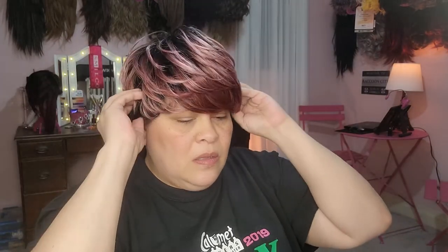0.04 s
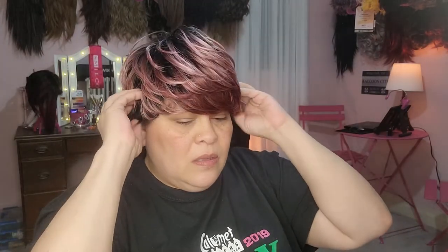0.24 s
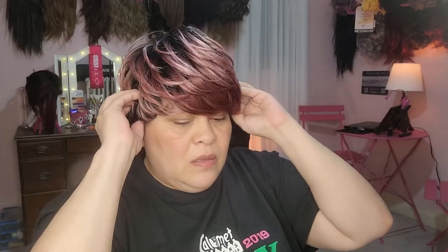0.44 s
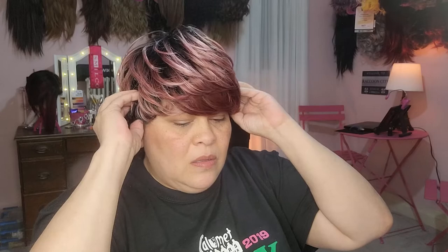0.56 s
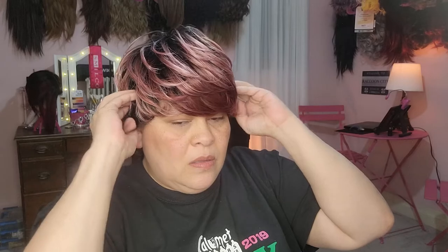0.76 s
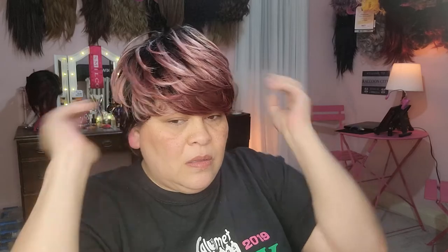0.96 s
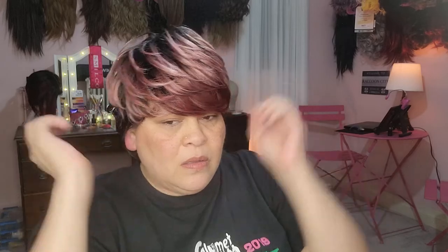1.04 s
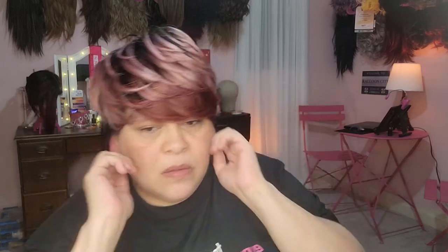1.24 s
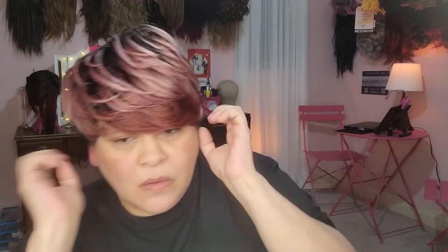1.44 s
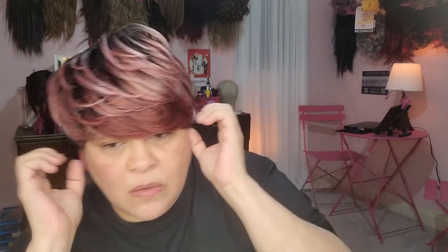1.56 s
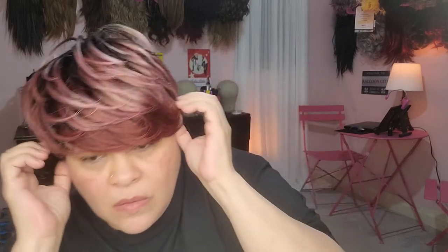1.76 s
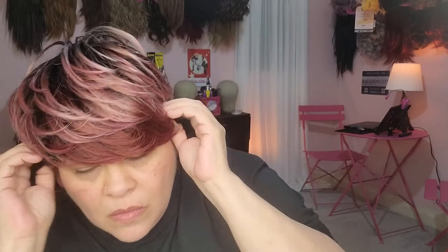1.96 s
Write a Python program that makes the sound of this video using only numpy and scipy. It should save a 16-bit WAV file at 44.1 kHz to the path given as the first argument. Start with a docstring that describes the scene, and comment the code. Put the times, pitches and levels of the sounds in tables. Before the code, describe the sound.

Wig fibres rubbed and settled by hand in a small room, with an early knock and fan hiss

```python
"""A small furnished room with a fan running: air hiss, wavering motor hum, low house rumble, a whistle every cycle.
Early on something knocks: ringing modes, a noise crack, and the room's answer as noise dying band by band.
Then hands settle a synthetic wig: fingers slide briefly off the fibres (grains through resonances), a clip ticks
(a noise burst with a short ring), and a long rub follows (coloured grains), with a few soft pats.
One microphone signal feeds both sides; the recorder leans right and folds loud bands to mono."""
import sys
import numpy as np
from scipy import signal
from scipy.fft import rfft, irfft
from scipy.io import wavfile
from scipy.ndimage import uniform_filter1d

SR = 44100
rng = np.random.default_rng(int(sys.argv[2]) if len(sys.argv) > 2 else 0)


def undo_db(level):
    """Turn decibels back into plain size, where 20 dB means ten times bigger."""
    steps = np.asarray(level, float) / 20
    return 10 ** steps


def unload_audio(sound):
    """Save the sound as a 16-bit wav file, at the path given as the first command line argument."""
    columns = np.transpose(np.atleast_2d(sound))
    # keep every value between -1 and 1, then stretch to whole-number steps
    steps = np.round(np.clip(columns, -1, 1) * 32767)
    wavfile.write(sys.argv[1], SR, steps.astype(np.int16))


N = 88200


def rms_one(x):
    """Scale to rms 1."""
    return x / np.sqrt(np.mean(x ** 2) + 1e-20)


def at_hz(points, hz):
    """Read a table's second column on a log-frequency axis."""
    p = np.array(points, float)
    return np.interp(np.log(hz + 1), np.log(p[:, 0] + 1), p[:, 1])


def in_time(rows, fade=False):
    """Join curve rows by straight lines; with fade, fall 400 dB per second outside them."""
    s, *columns = np.transpose(rows)
    t = np.arange(N) / SR
    outside = np.minimum(t - s[0], 0) + np.minimum(s[-1] - t, 0)
    edge_db = 400 * outside if fade else 0
    return [np.interp(t, s, column) + edge_db for column in columns]


def noise():
    """White noise of rms about 1."""
    return rng.standard_normal(N)


def colour(x, spectrum):
    """Filter x by a spectrum in dB over Hz."""
    gain_db = at_hz(spectrum, np.arange(N // 2 + 1) * SR / N)
    return irfft(rfft(x) * undo_db(gain_db), N)


def drift(rate_hz):
    """Slow random wander of rms 1: white noise through two equal one-pole low-passes."""
    r = np.exp(-2 * np.pi * rate_hz / SR)
    wander = signal.lfilter([1], [1, -2 * r, r * r], rng.standard_normal(N + SR))
    return rms_one(wander[SR:])  # the filter settles during the first second


def resonate(x, peaks):
    """Parallel resonances, each of rms 1 before its dB; the sum has rms 1."""
    out = 0
    for hz, width, db in peaks:
        r = np.exp(-np.pi * width / SR)
        poles = [1, -2 * r * np.cos(2 * np.pi * hz / SR), r * r]
        out = out + undo_db(db) * rms_one(signal.lfilter([1, 0, -1], poles, x))
    return rms_one(out)


def ring(clicks, hz, t60):
    """A two-pole mode: a unit click sets a decaying sine of starting height 1 ringing."""
    r, w = undo_db(-60 / (t60 * SR)), 2 * np.pi * hz / SR
    return signal.lfilter([0, np.sin(w)], [1, -2 * r * np.cos(w), r * r], clicks + 1e-18)


def strike(start_s, hz, db, t60):
    """One mode struck by one click."""
    click = np.zeros(N)
    click[int(start_s * SR)] = undo_db(db)
    return ring(click, hz, t60)


def burst(start, rise, t60, hold=0):
    """Envelope: linear rise, hold, exponential fall (all in seconds)."""
    t = np.arange(N) / SR - start
    return np.clip(t / rise, 0, 1) * undo_db(-60 * np.maximum(t - rise - hold, 0) / t60)


def house_rumble():
    """Low rumble of the house: coloured noise at a slowly changing level."""
    # Each row: time in seconds, level in dB.
    rumble_level = [(0.0, -65.5), (0.33, -67.5), (0.72, -70), (0.91, -82), (1.15, -75), (1.3, -77),
                    (1.49, -70), (1.65, -65), (2.0, -72)]
    # Spectrum of the rumble. Each row: frequency in Hz, density in dB per Hz.
    rumble_spectrum = [(25, -54), (40, -24), (60, -7), (100, -21), (160, -21), (300, -47)]
    return undo_db(in_time(rumble_level)[0]) * rms_one(colour(noise(), rumble_spectrum))


def fan_air():
    """Moving air: wavering coloured hiss, plus noise through narrow resonances."""
    # Spectrum of the fan air. Each row: frequency in Hz, density in dB per Hz.
    air_spectrum = [(120, -57), (200, -20), (320, -20.5), (600, -21.5), (760, -19), (850, -12.5),
                    (950, -20.5), (1500, -20.5), (2400, -24.5), (3200, -20.5), (3900, -15.5), (5600, -12),
                    (7000, -17.5), (8400, -24), (16000, -27.5)]
    # Gain on the hiss below 3.5 kHz. Each row: time in seconds, gain in dB.
    low_gain = [(0, 0), (.3, 1.5), (.4, -0.5), (.7, -2.5), (.8, -1), (1.05, 0), (1.3, -2.5), (2, 2)]
    # Resonances in the hiss. Each row: frequency in Hz, width in Hz, relative level in dB.
    air_peaks = [(5150, 50, -8), (5480, 90, -3), (5740, 150, 0), (6050, 90, -5), (6680, 80, -6)]
    air = undo_db(-53.5 + 1.0 * drift(3.6)) * rms_one(colour(noise(), air_spectrum))
    low = signal.sosfiltfilt(signal.butter(4, 3500, fs=SR, output="sos"), air)
    air = air - low + undo_db(in_time(low_gain)[0]) * low
    return air + undo_db(-53.5 + 0.87 * drift(3)) * resonate(noise(), air_peaks)


def motor_hum():
    """The motor's fundamental and second harmonic, each wavering on its own."""
    # Each row: time in seconds, rms level in dB of the fundamental, then of the second harmonic.
    hum_levels = [(0, -57, -77.5), (.2, -58.5, -70), (.35, -54.5, -66.5), (.47, -57.5, -68),
                  (.56, -68, -71.5), (.7, -71.5, -92), (.88, -70.5, -72), (.95, -84, -76.5),
                  (1.25, -80, -73.5), (1.35, -87, -87), (1.5, -70, -67), (1.72, -64, -72), (1.8, -67, -78),
                  (1.9, -78, -70.5), (2, -57, -62)]
    hum_hz, waver_db = 109, 1
    t = np.arange(N) / SR
    out = np.zeros(N)
    for harmonic, db in enumerate(in_time(hum_levels), start=1):
        level = np.sqrt(2) * undo_db(db + waver_db * drift(13))
        out += level * np.sin(2 * np.pi * hum_hz * harmonic * t)
    return out


def fan_whistle():
    """Once per fan cycle, narrow noise lines over a wide hiss swell up and die away."""
    # Lines of the whistle. Each row: frequency in Hz, width in Hz, relative level in dB.
    whistle_lines = [(3845, 16, -2), (4205, 30, -8), (4410, 14, 1), (4790, 16, -3), (5155, 30, -5)]
    first_s, cycle_s, spread_s = 0.604, 0.69, 0.041  # spread: standard deviation of each swell
    t = np.arange(N) / SR
    swell = sum(np.exp(-.5 * ((t - first_s - k * cycle_s) / spread_s) ** 2) for k in range(-1, 3))
    lines = undo_db(-54.5 + 2.5 * t) * resonate(noise(), whistle_lines)  # grows 2.5 dB per second
    hiss = undo_db(-59.5) * resonate(noise(), [(3800, 2700, 0)])
    return swell * (lines + hiss)


def room_answer(white, start_s):
    """The room answers the knock: octave bands of noise, each with its own decay."""
    # Decay of the room. Each row: frequency in Hz, t60 in seconds.
    room_t60 = [(100, 0.29), (400, 0.3), (1500, 0.21), (4000, 0.2), (10000, 0.2)]
    out = np.zeros(N)
    edges = 60 * 2 ** np.arange(0, 8.1, 1)
    for low, high in zip(edges, edges[1:]):
        band = signal.sosfilt(signal.butter(2, [low, high], "band", fs=SR, output="sos"), white)
        out += undo_db(-23.5) * band * burst(start_s, 0.014, at_hz(room_t60, np.sqrt(low * high)))
    return out


def knock():
    """A quick run of touches, each a crack of noise and a blow on the ringing modes."""
    # Each row: start in seconds, level on the modes in dB, level of the crack in dB.
    touches = [(.2100, -51, -27), (0.2128, -36.5, -21.5), (.2148, -36, -20.5), (.2165, -33.5, -21),
               (0.2196, -36, -30), (.2300, -40.5, -42), (.2385, -40.5, -50)]
    # Each row: frequency in Hz, relative level in dB, t60 in seconds.
    modes = [(144, -8, 0.13), (221.5, -3, 0.22), (355.5, -3, 0.13), (510, -13.5, 0.15), (616.5, -11, 0.18),
             (761.8, -5, 0.14), (916, 0.5, 0.15), (1166, 0, 0.14), (1230, 3.5, 0.068), (1456, -3.5, 0.059),
             (1614, -3.5, 0.069), (1810, -10, 0.11), (3120, 2, .05), (5540, -13.5, 0.055)]
    # Spectrum of crack and room answer. Each row: frequency in Hz, gain in dB.
    crack_spectrum = [(50, 4), (100, -6.5), (350, -3.5), (600, -10), (1100, 0.5), (2000, -4.5),
                      (3200, -5.5), (5300, -11.5), (7500, -19.5), (9500, -22), (12000, -44), (16000, -34)]
    start_s, blow_db, _ = np.transpose(touches)
    white = rms_one(colour(noise(), crack_spectrum))
    out = room_answer(white, start_s[0])
    for hz, mode_db, t60 in modes:
        clicks = np.zeros(N)
        scatter_db = rng.normal(0, 3.5, len(start_s))  # no two blows excite a mode alike
        clicks[(start_s * SR).astype(int)] = undo_db(blow_db + mode_db + scatter_db)
        out += ring(clicks, hz, t60)
    for at, _, crack_db in touches:
        out += white * undo_db(crack_db) * burst(at, 0.00049, 0.0095)
    return signal.sosfilt(signal.butter(3, 100, "high", fs=SR, output="sos"), out)


def clip_tick():
    """A bright scratchy tick: a short noise burst with a weaker tail, and a few ringing modes."""
    # Spectrum of the scratch. Each row: frequency in Hz, gain in dB.
    tick_spectrum = [(180, -59), (300, -39), (574, -37), (885, -26), (1170, -18.5), (2210, -15.5),
                     (3400, -15.5), (3760, -13.5), (7320, -0.5), (9240, -12.5), (16000, -10)]
    # Modes of the tick. Each row: frequency in Hz, level in dB, t60 in seconds.
    tick_modes = [(892, -51.5, 0.069), (935, -50, 0.076), (2216, -56, 0.23)]
    start_s = 0.9585
    shape = undo_db(-33.5) * burst(start_s, rise=0.003, t60=0.018, hold=0.0045)
    shape += undo_db(-42.5) * burst(start_s, rise=0.008, t60=0.25)
    out = shape * rms_one(colour(noise(), tick_spectrum))
    return out + sum(strike(start_s, *mode) for mode in tick_modes)


def soft_pats():
    """Small soft taps, each a single decaying mode."""
    # Each row: start in seconds, frequency in Hz, level in dB, t60 in seconds.
    taps = [(.978, 894, -45, .09), (1.385, 360, -46, .12), (1.39, 410, -50, .1)]
    return sum(strike(*tap) for tap in taps)


def grains():
    """Friction of fibres: dense random slips of either sign over smooth noise."""
    slips_per_s, spread_db, smooth_share = 4000, 1.5, 0.63  # share of the power
    slips = (rng.random(N) < slips_per_s / SR) * rng.choice([-1, 1], N)
    slips = slips * undo_db(spread_db * np.minimum(rng.exponential(1, N), 4))
    return np.sqrt(1 - smooth_share) * rms_one(slips) + np.sqrt(smooth_share) * noise()


def finger_slide():
    """Fingers slide off the fibres: grains through broad resonances."""
    # Each row: time in seconds, level in dB.
    slide_level = [(0.72, -86), (0.724, -80), (0.78, -58.5), (0.86, -51), (0.906, -57), (0.94, -64)]
    # Each row: frequency in Hz, width in Hz, relative level in dB.
    slide_peaks = [(1560, 270, -7.5), (2290, 460, 4), (3220, 600, 0), (4500, 800, -3), (9000, 7200, -9)]
    slide_db, = in_time(slide_level, fade=True)
    return undo_db(slide_db + 1.3 * drift(25)) * resonate(grains(), slide_peaks)


def wig_rub():
    """The long rub: body and treble grains at separate levels, with fibres catching in a band of their own."""
    # Each row: time in seconds, level of the body in dB, level of the treble in dB before a 3 dB lift.
    rub_levels = [(1.2, -57.5, -59), (1.3, -65, -65.5), (1.36, -57, -52.5), (1.395, -51.5, -51),
                  (1.43, -52, -56), (1.5, -50, -57), (1.57, -46.5, -54), (1.68, -49, -59.5),
                  (1.73, -48, -54), (1.77, -48, -51.5), (1.87, -48.5, -54.5), (1.92, -51.5, -56.5),
                  (2.0, -56.5, -65)]
    # Spectra of the two layers. Each row: frequency in Hz, gain in dB.
    body_spectrum = [(120, -33), (200, -10.5), (288, -10), (414, -4.5), (700, -9), (1060, -3.5), (1680, -3),
                     (2030, -4), (5000, -2), (6500, -10), (11000, -120)]
    treble_spectrum = [(3500, -16), (5000, -3), (7000, 2), (9000, -2.5), (12000, -5.5), (16000, -5)]
    # Fibres catching. Each row: time in seconds, level in dB.
    catch_level = [(1.4, -64), (1.5, -56.5), (1.59, -49.5), (1.66, -61), (1.76, -57.5), (1.88, -54.5),
                   (1.94, -74)]
    # Their resonances. Each row: frequency in Hz, width in Hz, relative level in dB.
    catch_peaks = [(1167, 200, -1.4), (1340, 210, -1.7), (1580, 83, 0)]
    body_db, treble_db = in_time(rub_levels, fade=True)
    catch_db, = in_time(catch_level, fade=True)
    body = undo_db(body_db + 0.84 * drift(27)) * rms_one(colour(grains(), body_spectrum))
    catches = undo_db(catch_db + 2.1 * drift(25)) * resonate(grains(), catch_peaks)
    treble = undo_db(treble_db + 3.0 + 0.89 * drift(30)) * rms_one(colour(grains(), treble_spectrum))
    return body + catches + treble


def scene():
    """Everything reaches the microphone as one sound, the same on both sides."""
    background = house_rumble() + fan_air() + motor_hum() + fan_whistle()
    hands = knock() + clip_tick() + soft_pats() + finger_slide() + wig_rub()
    return np.tile(background + hands, (2, 1))


def low_pass(x):
    """Removes everything above the highest recorded frequency."""
    return signal.sosfilt(signal.butter(12, 16640, fs=SR, output="sos"), x)


def record(dry):
    """Right is louder than left, but loud bands fold to mono a moment late; the top is cut."""
    # Bands louder than this fold to mono. Each row: frequency in Hz, level in dB per bin.
    mono_above = [(60, -66), (500, -73), (900, -74), (1500, -75), (2200, -76), (2600, -80), (3300, -84),
                  (3500, -95), (6800, -95), (7200, -83.5), (9000, -84.5), (11000, -83.5), (16000, -84.5)]
    side_share, onset_width = -0.37, 0.51  # side over mid; share of width left as a band turns loud
    late = 4  # frames of 512 samples, about 46 ms
    frame = dict(nperseg=2048, noverlap=1536)
    top_cut = signal.cheby2(12, 60, 15900 * 1.04, fs=SR, output="sos")  # 60 dB down from that frequency
    mid = signal.sosfilt(top_cut, dry[0])
    hz, _, cells = signal.stft(mid, SR, **frame)
    power = uniform_filter1d(abs(cells) ** 2, size=17, axis=0)  # smooth over bins
    power = uniform_filter1d(power, size=3, axis=1)  # smooth over frames
    quiet = 10 * np.log10(power + 1e-20) < at_hz(mono_above, hz)[:, None]
    quiet_before = np.concatenate([quiet[:, :late], quiet[:, :-late]], axis=1)
    width = quiet_before * np.where(quiet, 1, onset_width)
    side = side_share * signal.istft(cells * width, SR, **frame)[1][:N]
    return low_pass(np.array([mid + side, mid - side]))


dry = scene()
out = record(dry)
unload_audio(out)
```